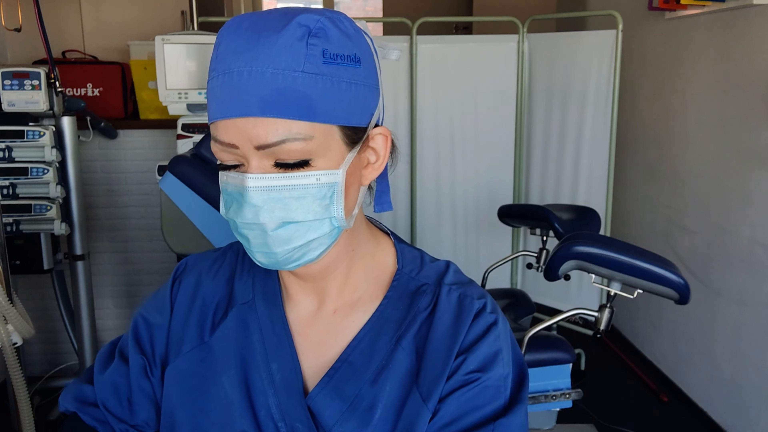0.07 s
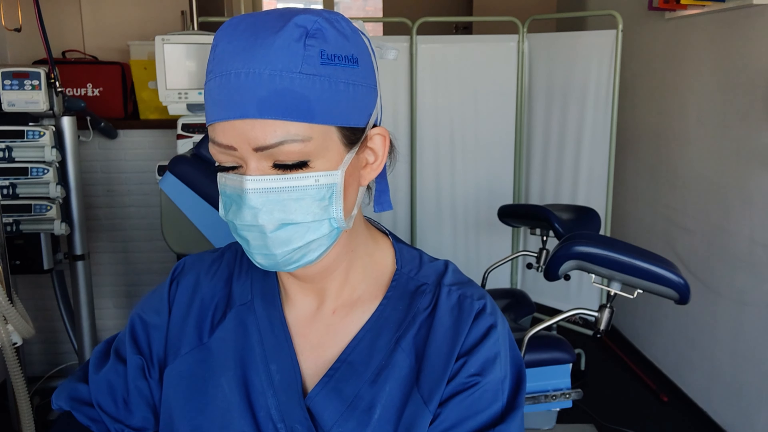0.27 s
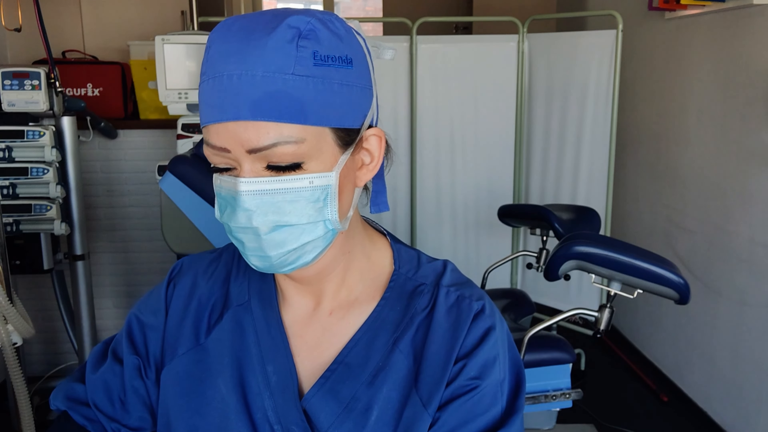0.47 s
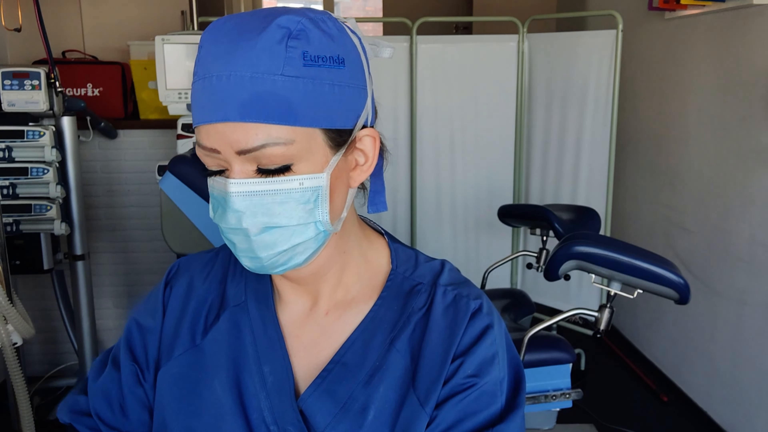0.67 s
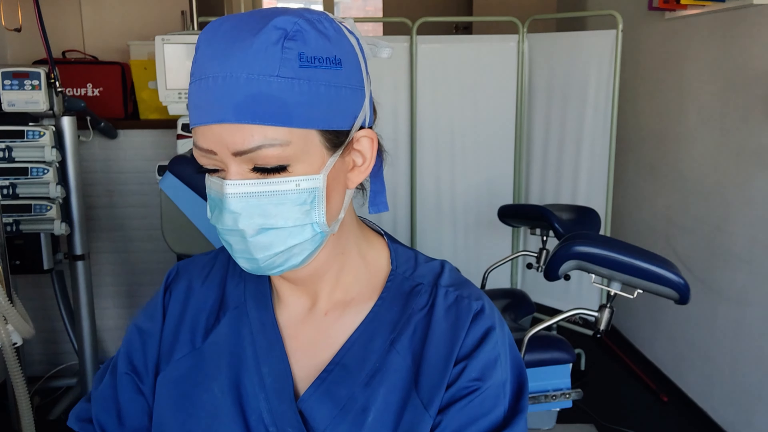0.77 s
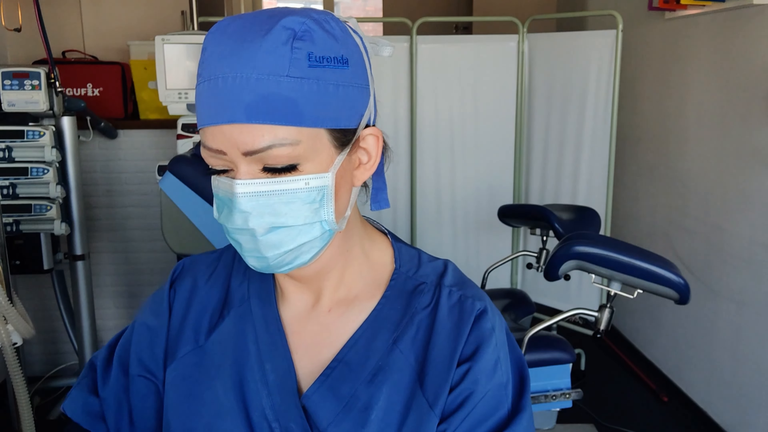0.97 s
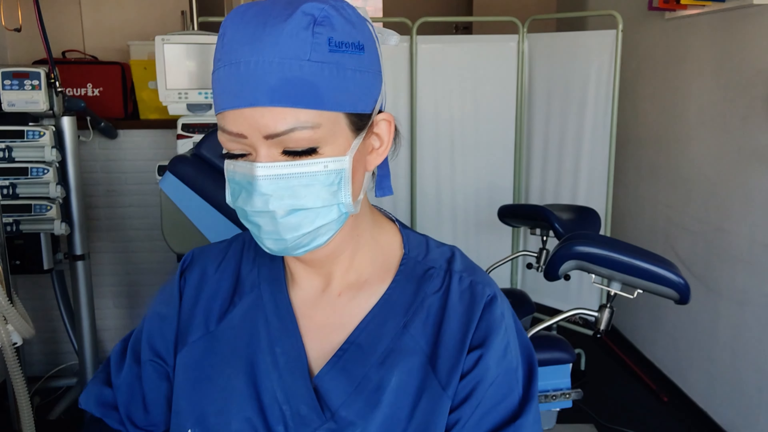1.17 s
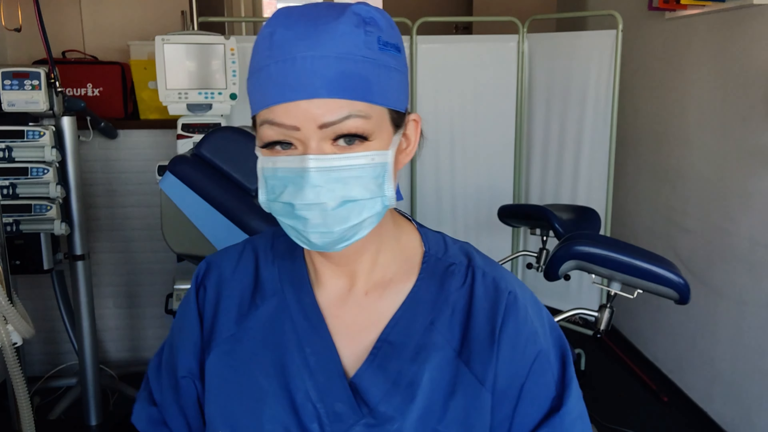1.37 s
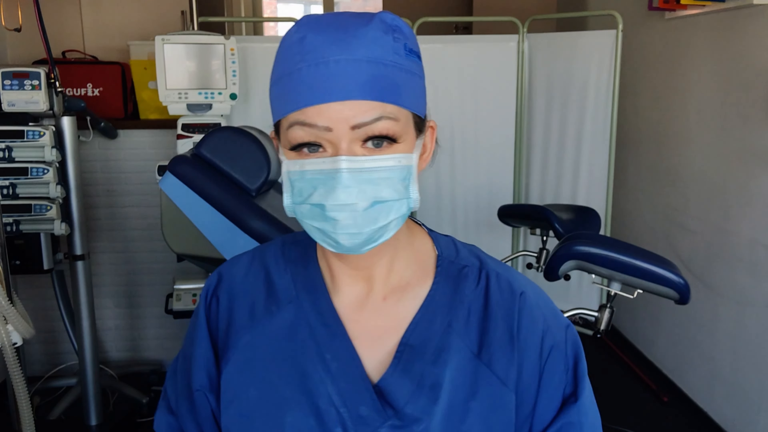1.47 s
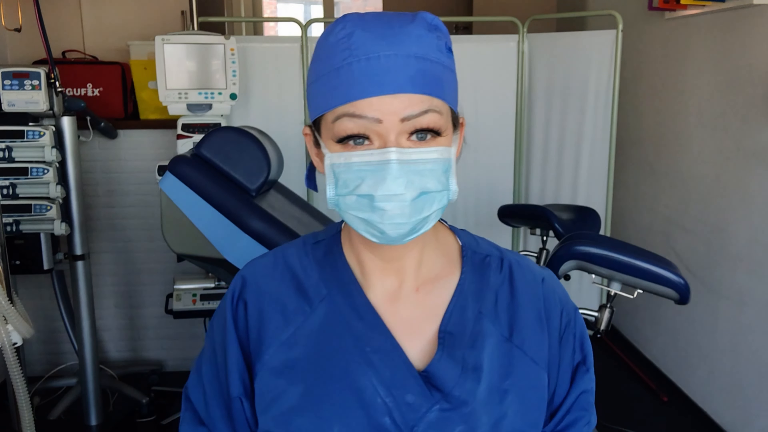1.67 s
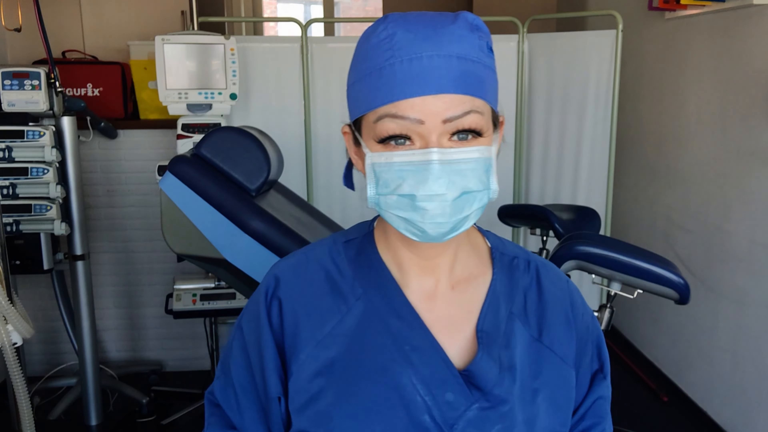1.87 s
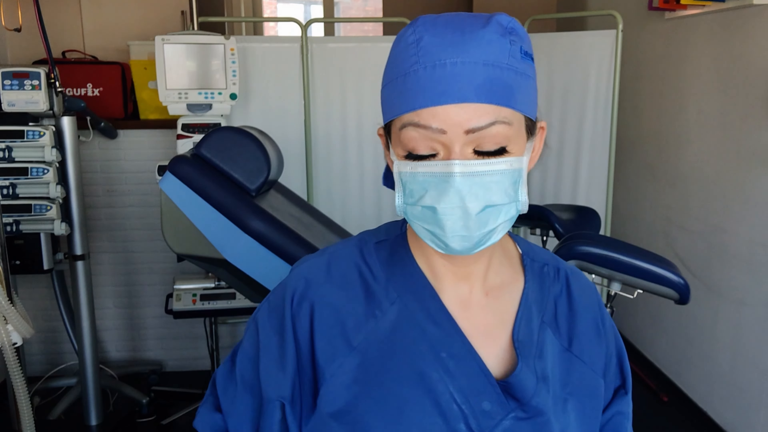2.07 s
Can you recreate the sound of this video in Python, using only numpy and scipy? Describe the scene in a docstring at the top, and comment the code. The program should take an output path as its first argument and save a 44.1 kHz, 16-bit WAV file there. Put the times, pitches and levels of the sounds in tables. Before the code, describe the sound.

Plastic and paper packaging crinkles and snaps briefly in a small hard room, then faint clothing rustles.

```python
"""Glove wrapper in a hard room

A stiff plastic and paper glove wrapper is pulled open in a small hard-walled room.
Snapping creases and fine crinkles are short noise bursts; the flapping sheet is a set of decaying tones.
Noise with a frequency-dependent decay lets the room ring out. Afterwards clothing, made of
swelling noise, shifts faintly over ventilation noise, a low hum, a drone and a rumble.
"""
import sys
import numpy as np
from scipy import signal
from scipy.fft import rfft, irfft, next_fast_len
from scipy.io import wavfile
from scipy.ndimage import uniform_filter1d, map_coordinates

SR = 44100
rng = np.random.default_rng(int(sys.argv[2]) if len(sys.argv) > 2 else 0)


def generate_wav(signal):
    """Clip the signal to [-1, 1] and save it as 16-bit WAV at the path in sys.argv[1]."""
    frames = np.transpose(np.atleast_2d(signal))
    scaled = np.clip(frames, -1, 1) * 32767
    pcm = np.round(scaled).astype(np.int16)
    wavfile.write(sys.argv[1], SR, pcm)


N = 94109
TOP_HZ = 15550  # band limit

# Spectral density of the plastic treble: f/Hz, relative level/dB
PLASTIC_COLOUR = [(300, -30.5), (2500, -9.5), (4500, -8), (6500, -1), (8500, -2.5), (11500, -4),
                  (14800, -0.5)]
# Spectral density of the paper body: f/Hz, relative level/dB
PAPER_COLOUR = [(70, -45), (200, 0), (420, 1.5), (680, -0.5), (950, 1), (1600, 2.5), (3000, -3),
                (5000, -3.5), (9000, -26.5)]
# Stereo width of the wrapper: f/Hz, side minus mid level/dB
WRAPPER_WIDTH = [(100, -18), (350, -9.5), (700, -8.5), (1300, -5.5), (2500, -4), (7000, -6.5),
                 (14000, -5.5)]
# Stereo width of the quiet sounds: f/Hz, side minus mid level/dB
QUIET_WIDTH = [(60, -17), (200, -11.5), (700, -3), (2400, -2), (5000, -1), (14000, -2.5)]


def amp(db):
    """Level to amplitude: 20 dB is a factor of ten."""
    return 10 ** (np.asarray(db) / 20)


def unit(x):
    """Normalisation to an rms of 1."""
    return x / np.sqrt(np.mean(x ** 2) + 1e-20)


def along(points, hz):
    """Interpolation of (f/Hz, value) points on a logarithmic frequency axis."""
    f, v = np.transpose(points)
    return np.interp(np.log(hz + 1), np.log(f + 1), v)


def clock():
    """Sampling instants in seconds."""
    return np.arange(N) / SR


def level(rows):
    """Amplitude envelope from (t/s, level/dB) points, linear in dB."""
    return amp(np.interp(clock(), *np.transpose(rows)))


def filtered(x, response):
    """Linear filtering: the spectrum is multiplied by a frequency response."""
    n = x.shape[-1]
    padded = next_fast_len(n + 8192)
    hz = np.fft.rfftfreq(padded, 1 / SR)
    return irfft(rfft(x, padded) * response(hz), padded)[..., :n]


def spread(pair, width):
    """Mid-side stereo: two incoherent signals, weighted at constant power, become left and right."""
    def mid_side_gains(hz):
        angle = np.arctan(amp(along(width, hz)))
        return np.array([np.cos(angle), np.sin(angle)])

    mid, side = filtered(pair, mid_side_gains)
    return np.array([mid + side, mid - side])


def coloured(pair, colour, width):
    """Spectral shaping: a stereo signal of rms 1 with the given density and width."""
    shaded = filtered(pair, lambda hz: amp(along(colour, hz)) * (hz < TOP_HZ))
    return unit(spread(shaded, width))


def noise():
    """Two statistically independent white noises."""
    return rng.standard_normal((2, N))


def band(hz, width):
    """Narrow-band noise of rms 1; width is a fraction of the centre frequency."""
    narrow = filtered(noise(), lambda f: 1 / (1 + ((f - hz) / (width * hz)) ** 2) ** 2)
    return unit(spread(narrow, QUIET_WIDTH))


def shaped(envelope, x):
    """Amplitude modulation with the energy that the envelope alone sets."""
    return unit(envelope * x) * np.sqrt(np.mean(envelope ** 2))


def swell(s, db, hz, length_s, width):
    """Gaussian envelope of standard deviation length_s on narrow-band noise."""
    envelope = np.exp(-((clock() - s) / length_s) ** 2 / 2)
    return amp(db) * shaped(envelope, band(hz, width))


def wobble(rate):
    """Smooth random modulation: a spline through random knots, rate of them a second."""
    return map_coordinates(rng.standard_normal(int(N * rate / SR) + 4), [clock() * rate])


def tone(hz, waver, rate):
    """Random phase modulation of a sine of rms 1: waver in radians, rate in knots a second."""
    turns = np.cumsum(hz * np.ones(N)) / SR + rng.random()
    return np.sqrt(2) * np.sin(2 * np.pi * turns + waver * wobble(rate))


def ventilation():
    """Stationary broadband noise with its energy at low frequency."""
    # Spectral density: f/Hz, relative level/dB
    vent_colour = [(15, -19), (26, 1.5), (46, -7.5), (65, -3.5), (104, -7.5), (135, -7.5), (240, -7),
                   (320, -11.5), (520, -23), (1000, -23), (3000, -28), (5600, -33.5), (9500, -35),
                   (15000, -29.5)]
    vent_db = -64
    return amp(vent_db) * coloured(noise(), vent_colour, QUIET_WIDTH)


def ventilation_hum():
    """Near-periodic source: a phase-modulated sine under a slow envelope."""
    # Level of the hum: t/s, level/dB
    hum_level = [(0, -77), (.6, -77), (.68, -65), (1.18, -67.5), (1.42, -80), (1.58, -67.5), (2.13, -77)]
    return level(hum_level) * tone(104.6, waver=.5, rate=11)


def deep_rumble():
    """Amplitude and phase modulation of a very low sine that comes and goes."""
    # Level of the rumble: t/s, level/dB
    rumble_level = [(0, -82), (.35, -72), (.47, -64), (.8, -68), (1.22, -76), (1.27, -59), (1.36, -60.5),
                    (1.5, -72), (1.6, -64.5), (1.75, -67), (1.88, -63), (2.1, -85)]
    return level(rumble_level) * tone(46, waver=.6, rate=14)


def low_drone():
    """Frequency modulation: the phase is the running sum of a gliding pitch."""
    # Course of the drone: t/s, level/dB, f/Hz
    drone_course = [(0, -73, 239), (.8, -74, 240.1), (1.08, -69.5, 252), (1.25, -79.5, 255),
                    (1.5, -66, 250), (1.7, -69.5, 220), (1.88, -72.5, 239.4), (1.98, -65.5, 222.7),
                    (2.13, -63, 245.3)]
    s, db, hz = np.transpose(drone_course)
    pitch_hz = np.interp(clock(), s, hz)
    return amp(np.interp(clock(), s, db)) * tone(pitch_hz, waver=.8, rate=26)


def background():
    """Superposition of the steady ventilation and the low tones."""
    return ventilation() + ventilation_hum() + deep_rumble() + low_drone()


def fabric_shift():
    """Sliding friction: broadband noise that follows the movement of the clothing."""
    # Strength of the movement: t/s, relative level/dB
    shift_level = [(.8, -80.5), (1.05, -72.5), (1.2, -80), (1.4, -73.5), (1.58, -70.5), (1.66, -70.5),
                   (1.76, -70.5), (1.8, -62.5), (1.87, -63), (1.96, -69), (2.06, -67.5), (2.13, -67.5)]
    # Spectral density: f/Hz, relative level/dB
    cloth_colour = [(100, -2), (500, -6.5), (700, -4), (1000, -5), (1600, -7.5), (2300, -8), (3200, -16.5),
                    (7000, -21), (15000, -33)]
    return level(shift_level) * coloured(noise(), cloth_colour, QUIET_WIDTH)


def fabric_brush():
    """Light friction: brighter noise than that of the shifting fabric."""
    # Strength of the brushing: t/s, relative level/dB
    brush_level = [(.85, -81.5), (1.03, -74.5), (1.25, -95), (1.35, -72.5), (1.49, -71), (1.56, -72),
                   (1.67, -73), (1.76, -76), (1.8, -71), (1.95, -84), (2.06, -75), (2.13, -83)]
    # Spectral density: f/Hz, relative level/dB
    brush_colour = [(300, -15.5), (1000, -4), (2300, -2.5), (3300, -6), (4500, -5), (5600, -6.5),
                    (9000, -11), (15000, -13.5)]
    return level(brush_level) * coloured(noise(), brush_colour, QUIET_WIDTH)


def fold_rubs():
    """Local friction: each fold gives a short swell of narrow-band noise."""
    # Rubbing folds: t/s, relative level/dB, centre f/Hz, standard deviation/s
    fold_events = [(1.581, -70.5, 2300, .012), (1.598, -72.5, 4270, 0.032), (1.853, -67, 820, 0.041),
                   (2.056, -70, 2330, 0.015)]
    return sum(swell(*row, width=0.35) for row in fold_events)


def settling_bump():
    """Soft contact: a smooth low-frequency pulse as the sitter straightens."""
    return swell(1.73, -59.5, 156, 0.035, width=0.25)


def clothing():
    """Superposition of friction in the fabric and the bump of the body."""
    clothing_db = 2.5
    return amp(clothing_db) * (fabric_shift() + fabric_brush() + fold_rubs() + settling_bump())


def room(x):
    """Reverberation: convolution with early reflections and a frequency-dependent decaying tail."""
    # Reverberation time: f/Hz, T60/s
    decay_time = [(100, .4), (500, .5), (2000, .66), (4500, .6), (7000, .55), (10000, .45), (14000, .33)]
    # Stereo width of the room: f/Hz, side minus mid level/dB
    room_width = [(100, -28), (350, -9.5), (700, -3.5), (1300, 5.5), (3000, -0.5), (14000, -2)]
    early_db, early_t60_s, wall_delay_s = -3.5, 0.031, 0.0017
    hz, t, z = signal.stft(rng.standard_normal((2, SR)), SR, nperseg=256)
    decay = amp(-60 * t / along(decay_time, hz)[:, None])
    tail = signal.istft(z * decay, SR, nperseg=256)[1]
    t = np.arange(tail.shape[1]) / SR
    early = rng.standard_normal(tail.shape) * np.exp(-np.log(1000) * t / early_t60_s)
    reflections = (unit(tail) + amp(early_db) * unit(early)) * (t > wall_delay_s)
    answer = spread(reflections, room_width) / np.sqrt(len(t))
    # any lead-in ahead of the scene is dropped, its ringing stays
    return signal.fftconvolve(x[None], answer, axes=1)[:, len(x) - N:len(x)]


def flaps():
    """Flexural vibration: the sheet bends and rings briefly at an unsteady low pitch."""
    # Flaps of the sheet: t/s, level/dB, f/Hz, time to the peak/s
    flap_events = [(0.036, -45.5, 540, .005), (0.038, -48, 1150, .003), (.188, -55, 210, .008),
                   (0.21, -46.5, 650, .006), (.228, -52, 96, .009), (.341, -45, 670, .006),
                   (.361, -45, 220, .005), (0.363, -47, 690, .005), (0.407, -50, 230, .006),
                   (0.435, -50.5, 125, .009), (.437, -47.5, 282, .007), (.493, -49.5, 204.9, 0.0083),
                   (.510, -50, 650, .005), (.529, -52.5, 260, .006), (.531, -44, 680, .005)]
    waver_rad, knots_per_cycle = 0.61, .35
    out = np.zeros(N)
    for s, db, hz, rise_s in flap_events:
        u = np.maximum(clock() - s, 0) / rise_s
        envelope = u * np.exp(1 - u)  # peaks at 1 when u is 1
        out += amp(db) * envelope * tone(hz, waver_rad, knots_per_cycle * hz)
    return out


def crinkles():
    """Shot noise: random tiny buckles of uneven size, as loud as the handling is hard."""
    # Strength of the handling: t/s, relative level/dB
    handling_level = [(0, -45), (.06, -49.5), (.145, -52.5), (.165, -40.5), (.215, -40.5), (.295, -47),
                      (.37, -40.5), (.42, -55.5), (.445, -35.5), (.475, -56.5), (.535, -46.5), (.6, -47),
                      (.635, -59.5)]
    buckles_per_s, size_spread_db, life_s = 1400, 3.4, 0.00035
    plastic_db, paper_db = -0.5, -4
    size = amp(size_spread_db * np.clip(rng.standard_normal(N), -2, 2))
    buckles = size * (rng.random(N) < buckles_per_s / SR)
    # each buckle leaves an exponentially dying energy
    power = signal.lfilter([1], [1, -np.exp(-2 / (life_s * SR))], buckles ** 2)
    handling_ends_s = handling_level[-1][0]
    grain = unit(np.sqrt(power)) * level(handling_level) * (clock() < handling_ends_s)
    plastic = amp(plastic_db) * grain * coloured(noise(), PLASTIC_COLOUR, WRAPPER_WIDTH)
    paper = amp(paper_db) * grain * coloured(noise(), PAPER_COLOUR, WRAPPER_WIDTH)
    return plastic, paper


def snaps():
    """Snap-through: a crease gives way at once in tiny jerks, with a spectral ripple of its own."""
    # Snapping creases: t/s, relative treble level/dB, relative paper body minus treble level/dB, length/s
    snap_events = [(.0248,-37,-10,.001), (.0414,-27.5,-4,.0018), (.0438,-33,-6,.0015), (.0533,-34,-7,.0013),
                   (.0783,-41,-2,.0015), (.1138,-34,-11,.002), (.1358,-37,-12,.002), (.1573,-31,-4,.0014),
                   (.1729,-28,-19,.0004), (.1778,-34,-13,.002), (.1883,-29,-13,.003), (.1956,-33,-12,.0015),
                   (.2066,-33,-6,.0016), (.2172,-30,-7,.0012), (.271,-37,-8,.002), (.2787,-32,-9,.0015),
                   (.3139,-26.5,-17,.0013), (.3272,-36,-9,.0012), (.3418,-24,-16,.0018),
                   (.3635,-29.5,-5,.0007), (.373,-36,-6,.002), (.3949,-35,-5,.001), (.4316,-26.5,-12,.0026),
                   (.4369,-27.5,-8,.002), (.4397,-25,-4,.0027), (.447,-32,-6,.0022), (.4532,-28,-19,.0014),
                   (.4866,-30,-12,.0014), (.5082,-32,-7,.0016), (.5154,-34,-3,.0022), (.5286,-32,-19,.0007),
                   (.536,-26,-6,.0024), (.5854,-30,-7,.0016), (.5915,-37,-7,.0015), (.6459,-41.5,-1,.0018)]
    treble_db, body_trim_db = -2, -1
    jerk_db, jerks_per_s = 2, 4000
    ring_db, least_spacing_hz = 3, 2200  # resonances of a crease
    attack_s, release_s = .0001, .0005
    out = np.zeros((2, 2, N))  # material, channel, sample
    age = np.arange(round(.012 * SR)) / SR
    plastic = coloured(noise(), PLASTIC_COLOUR, WRAPPER_WIDTH)
    paper = coloured(noise(), PAPER_COLOUR, WRAPPER_WIDTH)
    jerks = amp(jerk_db * wobble(jerks_per_s))
    for s, db, body_db, length in snap_events:
        stretch, shift = rng.random(2)
        start = round(s * SR)
        near = slice(start, start + len(age))
        attack = 1 - np.exp(-age / attack_s)
        burst = attack * np.exp(-np.maximum(age - length, 0) / release_s)
        spacing_hz = least_spacing_hz * (1 + stretch)
        ring = lambda hz: amp(ring_db * np.cos(2 * np.pi * (hz / spacing_hz + shift)))
        gains = amp([db + treble_db, db + body_db + body_trim_db])
        for part, layer, gain in zip(out, (plastic, paper), gains):
            part[:, near] += gain * shaped(burst, jerks[near] * filtered(layer[:, near], ring))
    return out


def thin(x):
    """Radiation efficiency: small creases radiate no bass."""
    cut_hz = 160
    return filtered(x, lambda hz: hz ** 2 / np.hypot(hz ** 2, cut_hz ** 2))


def room_send(plastic, paper):
    """Source strength: plastic and paper excite the room unequally."""
    return amp(-4) * plastic + amp(1) * paper


def wrapper():
    """Direct and reverberant sound, placed to the left by differences of time and level."""
    flap_room_db = -11
    under_way_s = .13  # the room already rings with this much earlier handling
    paper_lead_s = 0.00026  # paper and sheet reach the left ear first
    snap, crinkle, sheet = thin(snaps()), thin(np.array(crinkles())), flaps()
    # the earlier handling is the opening crinkle mirrored in time
    running = np.pad(room_send(*crinkle)[0], (round(under_way_s * SR), 0), mode="reflect")
    wet = room(running) + room(room_send(*snap)[1]) + amp(flap_room_db) * room(sheet)
    plastic, paper = snap + crinkle
    lead = lambda hz: np.exp(1j * np.pi * paper_lead_s * np.outer([1, -1], hz))
    body = filtered(paper + sheet, lead)
    # f/Hz, left minus right level/dB
    lean_db = [(150, -1), (600, 2.5), (1200, 4), (2500, 1.0), (9000, 0.5), (14000, 0.0)]
    lean = lambda hz: amp(np.outer([.5, -.5], along(lean_db, hz)))
    return filtered(plastic + body + wet, lean)


def scene():
    """Superposition of the wrapper, the clothing and the quiet background."""
    return wrapper() + clothing() + background()


def denoised(x):
    """Downward expansion: the recorder turns down each band whose own level falls near silence."""
    quiet_db = -59  # half the reduction acts here, re an equally dense white noise
    reduction_db, reduction_s = 4.5, 0.037  # depth, reaction time
    z = signal.stft(x, nperseg=512)[2]
    white = signal.stft(rng.standard_normal(N), nperseg=512)[2]
    power = np.mean(abs(z) ** 2, axis=0) / np.mean(abs(white) ** 2)
    keep = np.exp(-256 / (SR * reduction_s / 2))  # 256 samples between frames
    # smoothed over neighbouring bands, then both ways in time
    power = uniform_filter1d(power, size=9, axis=0)
    power = signal.filtfilt([1 - keep], [1, -keep], power)
    gain = amp(-reduction_db / (1 + (power / amp(quiet_db) ** 2) ** 2))
    return signal.istft(z * gain, nperseg=512)[1][:, :N]


def record(dry):
    """Transducer response: the microphone port rings in the treble, then expansion and a band limit."""
    # Response of the microphone: f/Hz, gain/dB
    port_gain = [(4800, -0.5), (5700, -2.5), (6300, 1.5), (6850, 6.5), (7500, 4.5), (8600, 1)]
    heard = filtered(dry, lambda hz: amp(along(port_gain, hz)))
    return filtered(denoised(heard), lambda hz: hz < TOP_HZ)


dry = scene()
out = record(dry)
generate_wav(out)
```